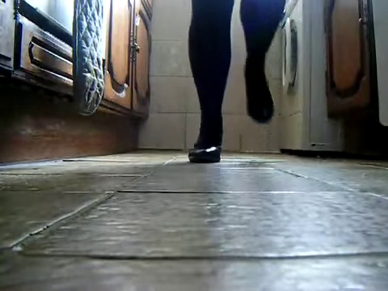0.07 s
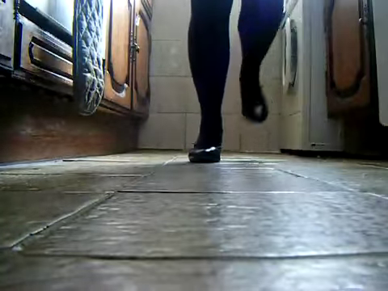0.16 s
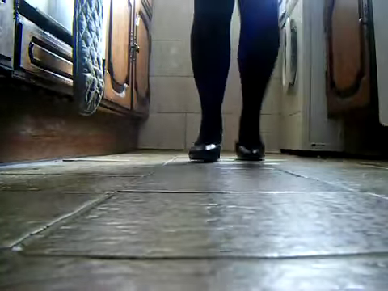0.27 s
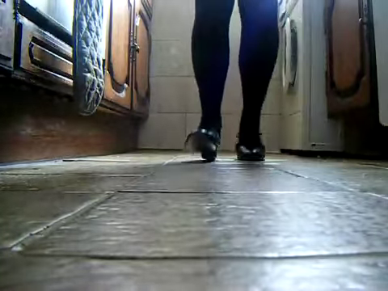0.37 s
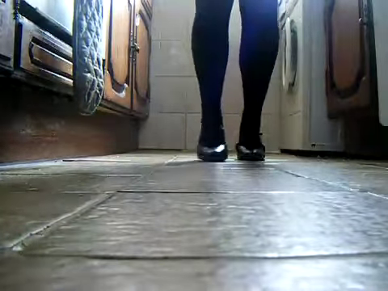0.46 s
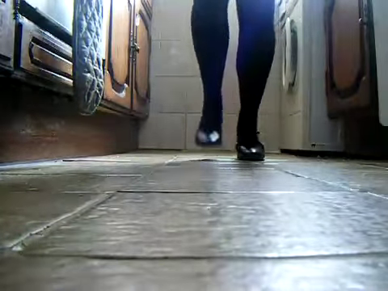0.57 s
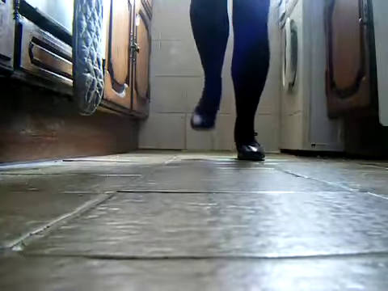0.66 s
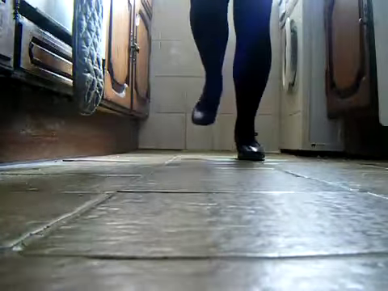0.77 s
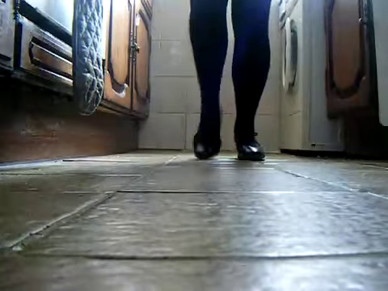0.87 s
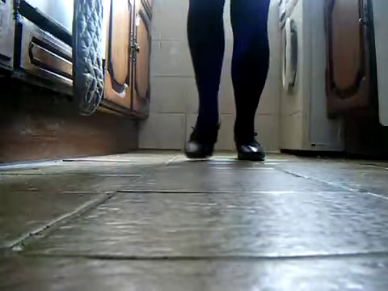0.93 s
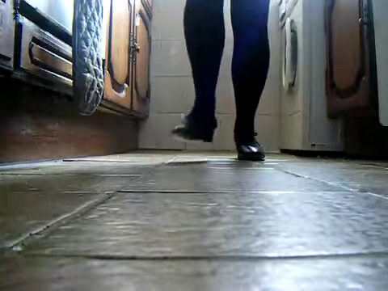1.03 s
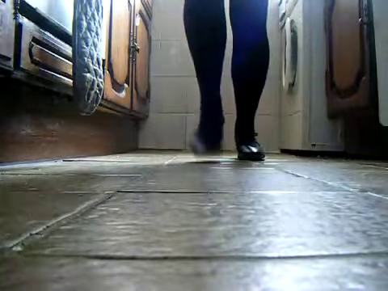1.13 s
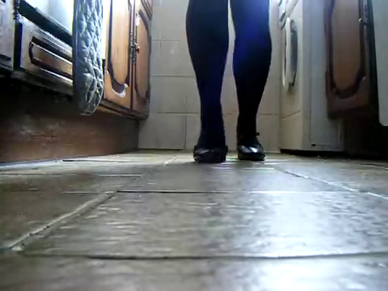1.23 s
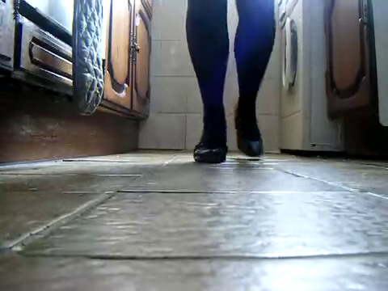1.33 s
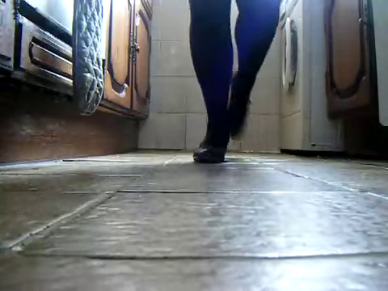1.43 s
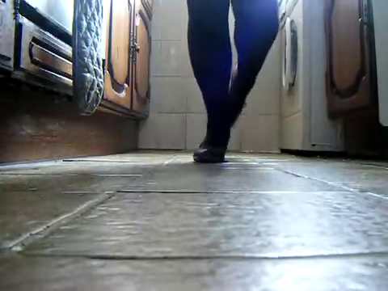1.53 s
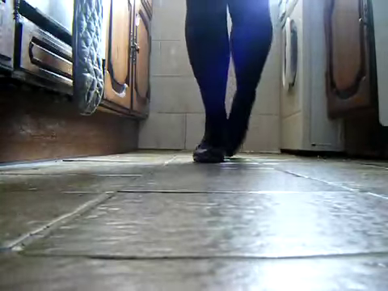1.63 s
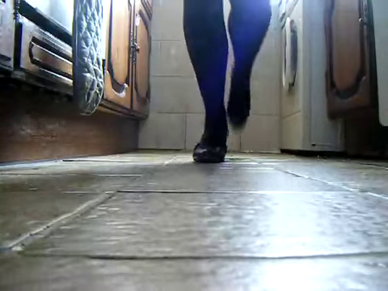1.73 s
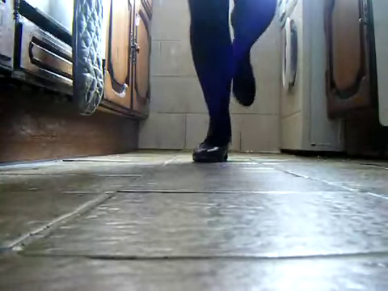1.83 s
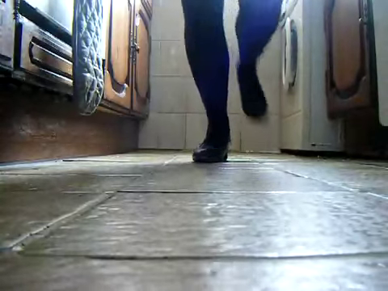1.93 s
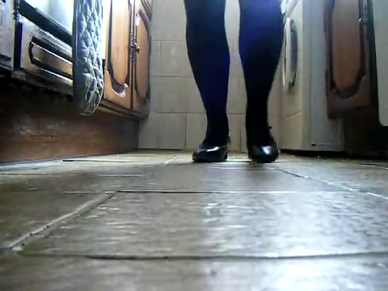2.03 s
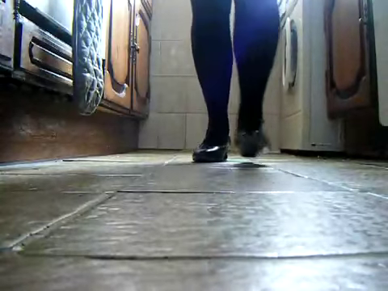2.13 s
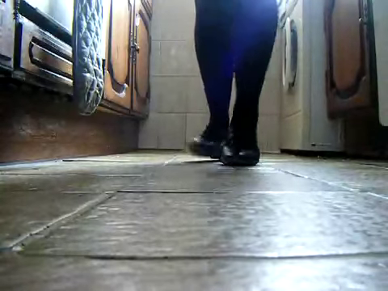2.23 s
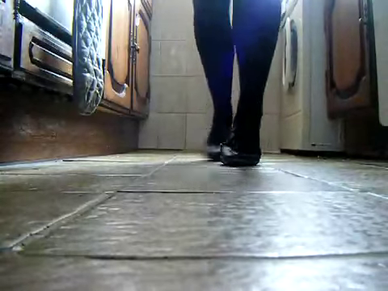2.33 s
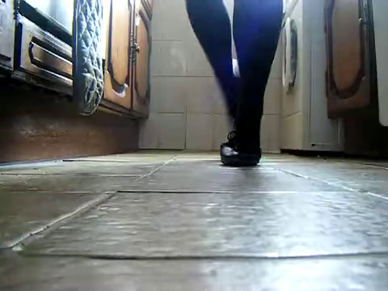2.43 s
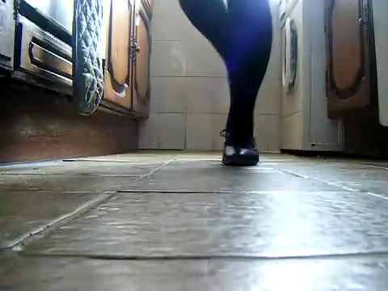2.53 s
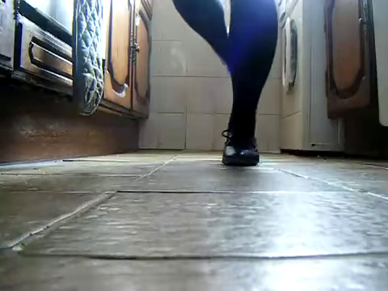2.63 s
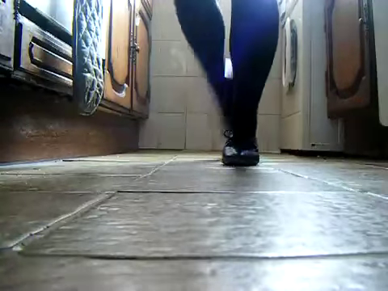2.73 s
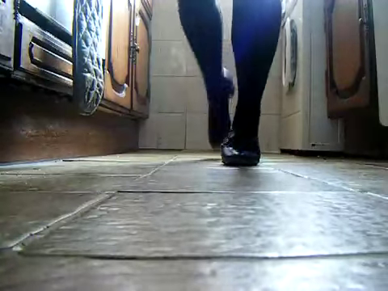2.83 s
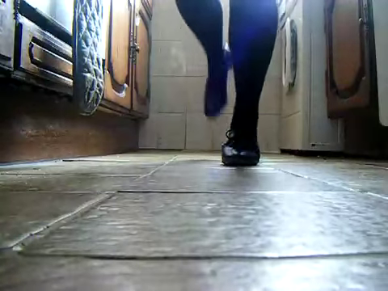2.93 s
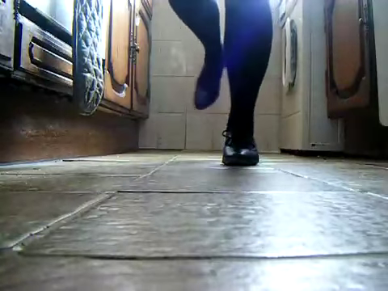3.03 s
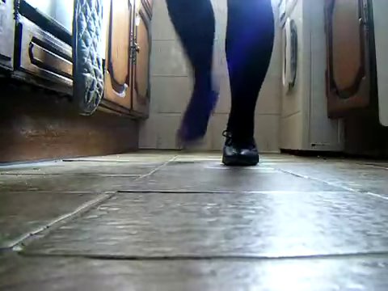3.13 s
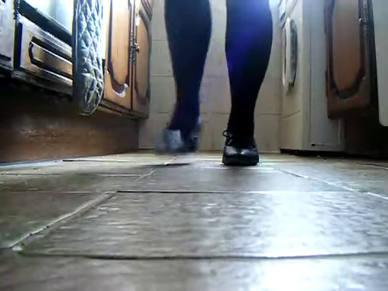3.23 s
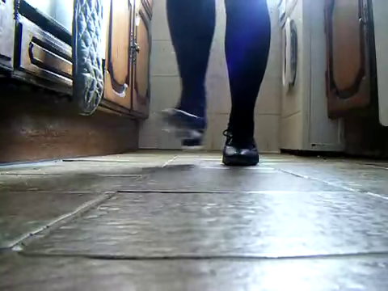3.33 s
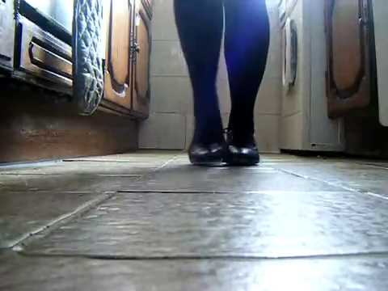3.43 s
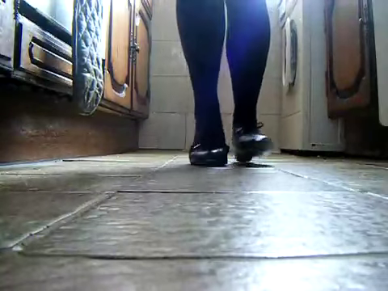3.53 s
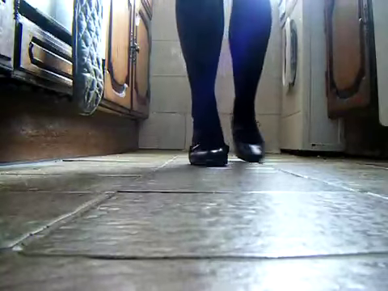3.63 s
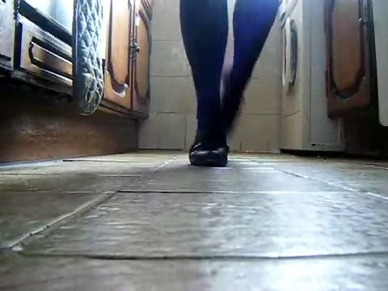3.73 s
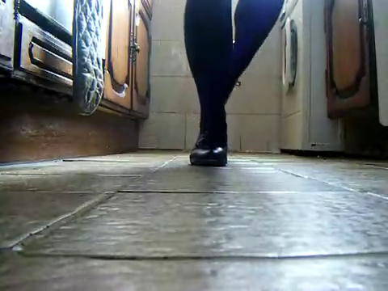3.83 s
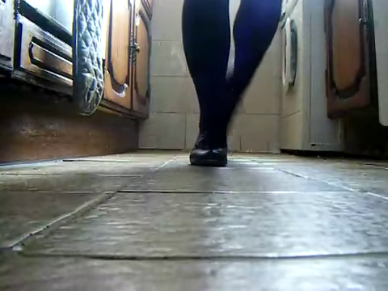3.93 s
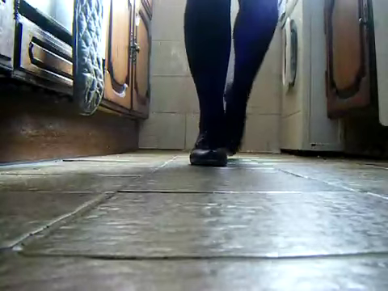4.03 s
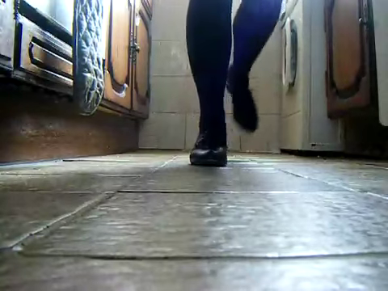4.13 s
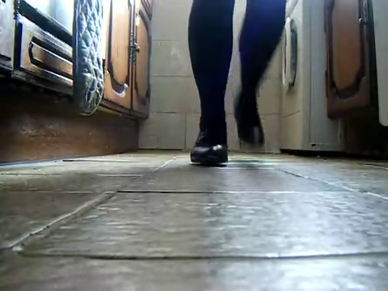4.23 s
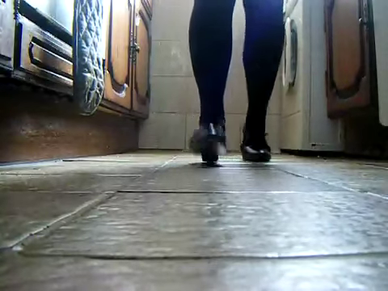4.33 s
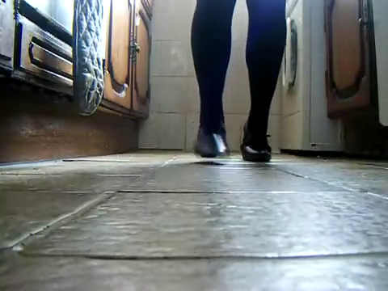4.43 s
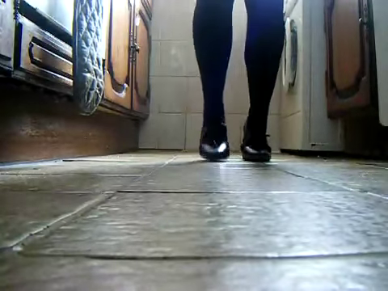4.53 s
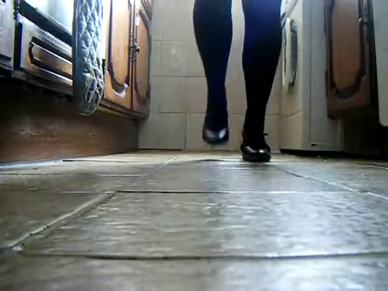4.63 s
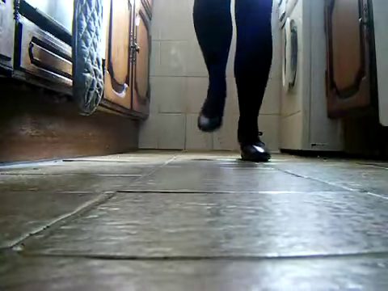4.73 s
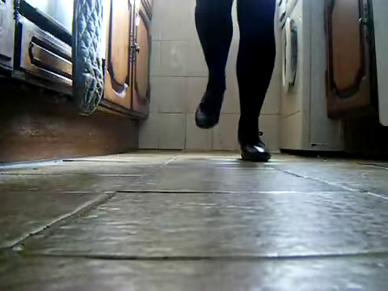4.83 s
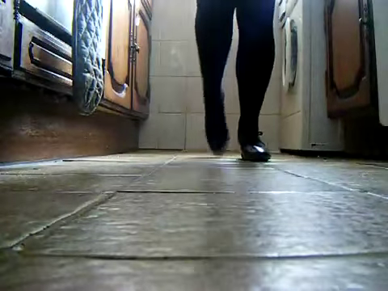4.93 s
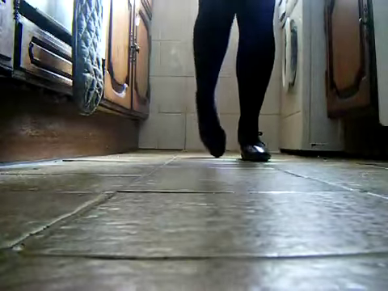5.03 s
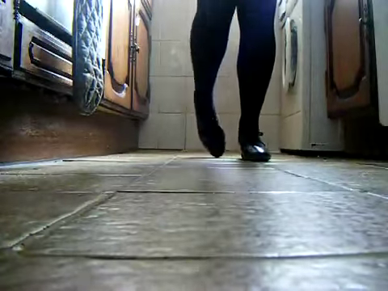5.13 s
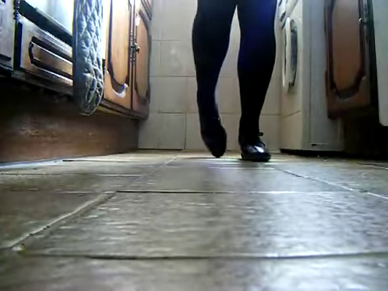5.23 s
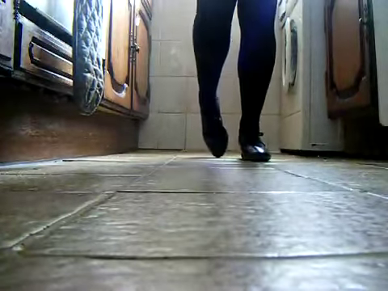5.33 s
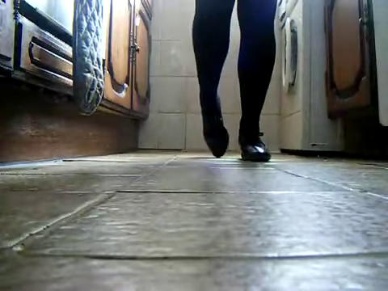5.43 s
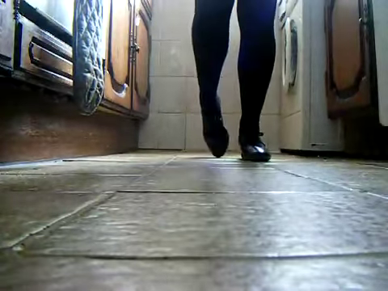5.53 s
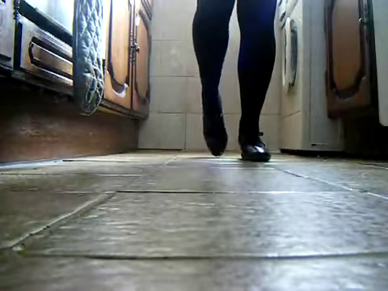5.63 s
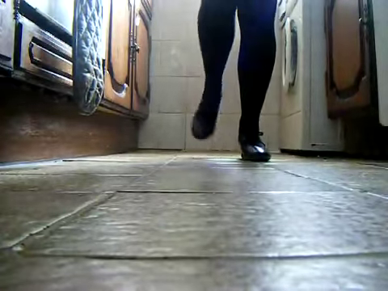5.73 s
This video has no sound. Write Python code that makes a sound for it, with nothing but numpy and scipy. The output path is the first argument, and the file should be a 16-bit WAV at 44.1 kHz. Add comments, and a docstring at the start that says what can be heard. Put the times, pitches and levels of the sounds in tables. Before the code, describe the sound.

Tap dancing on hard tile in a small kitchen, heard close from a floor-level microphone, begins mid-dance. From 0 to 1 s, clacks come about every 0.2 s, strong at 0.1, 0.5 and 0.7, softer at 0.3 and 0.85, with faint grazes and tiny skids between. A bright metallic tap lands at 1.1, then one of the hardest cracks at 1.4, a medium tap at 1.6, a dull heel drop at 1.8 and a tap at 2.0. Sharp taps cluster at 2.25, 2.4 and 2.55, some trailed by gritty scrapes. Softer steps at 2.75, 3.0 and 3.2 lead to strong ones at 3.4, 3.65 and 3.85. A heel thuds at 4.2; taps follow at 4.5, 4.7, 4.9 and finally 5.2 s, joined by a heel. Every click dies in milliseconds, leaving a short, boxy echo swelling slightly over steady low room tone and hiss, which remain after the last step.

```python
"""A dancer in tap shoes steps on the tiled floor of a small, hard kitchen, heard from a microphone on the floor.
Taps, heel drops, touches and skids push damped modes of shoe, tile and tap plate; each strike rings for milliseconds.
The room answers with first walls, a diffuse tail and standing waves, over steady room tone and hiss.
Gain control ducks after loud strikes and climbs back steadily, holding the echo up as a short wash."""
import sys
import numpy as np
from scipy import signal
from scipy.fft import rfft, irfft, next_fast_len
from scipy.io import wavfile
from scipy.ndimage import uniform_filter1d, minimum_filter1d

SR = 44100
rng = np.random.default_rng(int(sys.argv[2]) if len(sys.argv) > 2 else 0)


def master_out(mix):
    """Clip the mix to full scale and print it as 16-bit PCM to the path in sys.argv[1]."""
    frames = np.transpose(np.atleast_2d(mix))
    ceiling = np.clip(frames, -1, 1)
    pcm = np.round(ceiling * 32767).astype(np.int16)
    wavfile.write(sys.argv[1], SR, pcm)


N = 255339
LEAD = SR // 5  # samples before the audible start: the dance is already under way
TAP_ROOM_DB, HEEL_ROOM_DB, TOUCH_ROOM_DB, SKID_ROOM_DB = 2.5, -4, 2.5, -3

# full taps; pitch and ring depend on the part of the shoe that lands:
# (time [s], force [dB], sole pitch [Hz], knock [dB], plate pitch [Hz], plate [dB], jingle [dB])
FULL_TAPS = [(-0.06, 12.5, 640, -5, 2670, 0, -4), (0.0874, 19, 1004, -3.5, 2620, 0, -13.5),
             (0.293, -1, 680, 2.5, 3810, -3, -13.5), (0.488, 19, 984, -3.5, 3990, -3.5, -19.5),
             (0.684, 19, 730, -26, 5270, 0.5, -4), (0.8525, 5, 925, 0, 4380, -5, -10),
             (1.085, 17, 860, -1, 3890, 5, -10.5), (1.384, 24.5, 877, 0.5, 4500, -26, -10.5),
             (1.609, 10, 650, 0, 2830, -7, -10), (2.0126, 9.5, 717, 1.5, 2300, -16, -12.5),
             (2.239, 20.5, 1013, -3, 4530, -9.5, -24.5), (2.404, 13, 1028, 2.5, 4700, -1.5, -25.5),
             (2.561, 22, 880, -0.5, 4260, -15.5, -7.5), (2.743, 2, 682, -1, 4260, -9.5, -24),
             (2.9947, 9, 648, -1.5, 3510, -1.5, -21.5), (3.22, -3, 637, 0.5, 4200, -7.5, -20),
             (3.391, 18.5, 910, -1.5, 4230, -12, -10), (3.662, 15, 800, -0.5, 3690, 2.5, -14),
             (3.8425, 19.5, 1144, -4.5, 4070, -3.5, -18.5), (4.028, -0.5, 910, 2.5, 4560, -4, -26),
             (4.489, 15.5, 982, -5, 4280, -4, -22.5), (4.6843, 18, 820, -2, 2620, -8, -9),
             (4.9269, 4.5, 744, -1.5, 4480, -7, -23), (5.1785, 8.5, 920, -1, 4000, -14, -9.5)]
# weight comes down on a heel, alone or with a tap: (time [s], force [dB], sole pitch [Hz])
HEEL_LANDINGS = [(1.8342, 4.5, 550), (2.9952, -0.5, 416), (4.2098, 2, 964), (5.1776, -5, 885)]
# a shoe grazes the tile between taps: (time [s], force [dB])
LIGHT_TOUCHES = [(.064, -27), (.452, -25), (3.189, -24), (3.588, -24)]
# the toe plate catches again and skids: (time [s], length [s], level [dB])
TOE_SKIDS = [(.009, .012, -12.5), (.585, .02, -5.5), (0.641, .014, -6.5), (1.125, .012, 5.5),
             (1.158, .01, -1), (1.503, .014, 1), (2.248, .012, 4), (2.3108, .024, -0.5), (2.604, .03, 5),
             (3.412, .025, 6), (3.886, .02, 5.5), (4.612, .012, -6)]


def dance():
    """Taps, heel drops, light touches and skids, all in the same room."""
    track = np.zeros(LEAD + N)
    for time_s, force_db, *shoe in FULL_TAPS:
        land(track, amp(force_db) * tap(force_db, *shoe), time_s, TAP_ROOM_DB)
    for time_s, force_db, sole_hz in HEEL_LANDINGS:
        land(track, amp(force_db) * heel(sole_hz), time_s, HEEL_ROOM_DB)
    for time_s, force_db in LIGHT_TOUCHES:
        land(track, amp(force_db) * touch(), time_s, TOUCH_ROOM_DB)
    for time_s, length_s, level_db in TOE_SKIDS:
        land(track, amp(level_db) * skid(length_s), time_s, SKID_ROOM_DB)
    return track


SOLE_HZ, RING = 857, 0.54  # a shoe that lands nearer its tip rings higher and, in proportion, longer
KNOCK_HZ, KNOCK_FOLLOWS = 1850, 0.16  # octaves the tile's knock rises per octave of the sole
WEIGHT_DB, THUD_DB_PER_DB = -3.5, -0.5244  # the foot's weight stays alike, so sharper taps hold less thud


def tap(force_db, sole_hz, knock_db, plate_hz, plate_db, jingle_db):
    """The shoe's tilt sets the knock's pitch and the ring, the force sets the share of thud."""
    tilt = sole_hz / SOLE_HZ
    thud_db = WEIGHT_DB + THUD_DB_PER_DB * force_db
    knock_hz = KNOCK_HZ * tilt ** KNOCK_FOLLOWS
    return strike(thud_db, sole_hz, knock_hz, knock_db, plate_hz, plate_db, jingle_db, RING * tilt)


def heel(sole_hz):
    """A heel drop is mostly thud; the weighted plate hardly jingles."""
    return strike(thud_db=12.5, sole_hz=sole_hz, knock_hz=1780, knock_db=-2,
                  plate_hz=3356, plate_db=-5, jingle_db=-24.5, ring=0.79)


def touch():
    """An unweighted shoe rings freely."""
    return strike(thud_db=-11, sole_hz=920, knock_hz=1710, knock_db=-4,
                  plate_hz=4030, plate_db=-25, jingle_db=-21.5, ring=1.6)


def skid(length_s, grains_per_s=350, scatter_db=4, first_catch_db=-3):
    """The plate catches and slips on the tile: a run of tiny contacts of uneven size."""
    size = round(length_s * SR)
    catches = rng.random(size) < grains_per_s / SR
    grains = catches * amp(scatter_db * rng.standard_normal(size) - scatter_db)
    grains[0] = amp(first_catch_db)
    tick = strike(thud_db=-26.0, sole_hz=764, knock_hz=1350, knock_db=2.5,
                  plate_hz=2900, plate_db=-7.5, jingle_db=0.5, ring=0.29)
    return signal.fftconvolve(grains, tick)


# modes of the loose tap plate and its screws: (frequency [Hz], Q [1], level [dB])
PLATE_JINGLE = [(2276, 2.42, 8.5), (3661, 3.4, -0.5), (4760, 2.61, 7)]


def strike(thud_db, sole_hz, knock_hz, knock_db, plate_hz, plate_db, jingle_db, ring):
    """One contact of peak 1: a push into the modes of shoe, tile and plate; ring scales their Q."""
    f = np.fft.rfftfreq(SR // 20, 1 / SR)
    shoe = amp(thud_db) * resonance(f, hz=315.5, q=1.095) + resonance(f, sole_hz, q=2 * ring)
    tile = amp(knock_db) * resonance(f, knock_hz, q=3 * ring)
    plate = amp(plate_db) * resonance(f, plate_hz, q=6 * ring)
    loose = sum((-1) ** k * amp(level_db) * resonance(f, hz, q)
                for k, (hz, q, level_db) in enumerate(PLATE_JINGLE))
    jingle = amp(jingle_db) * loose
    # the contact time rounds off the treble, and a small shoe radiates little bass
    contact_hz, radiation_hz = 5400, 150
    soft = signal.freqs(*signal.butter(8, 1, analog=True), f / contact_hz)[1]
    thin = signal.freqs(*signal.butter(2, 1, "high", analog=True), f / radiation_hz)[1]
    click = irfft((shoe + tile + plate + jingle) * soft * thin)
    return click / np.abs(click).max()


def resonance(f, hz, q):
    """The same damped mode applied twice at one pitch: the ring swells for a cycle, then dies."""
    damping = 1j * f * hz / q
    return (damping / (hz * hz - f * f + damping)) ** 2


def land(track, click, time_s, room_db):
    """A strike arrives faintly through the floor, then through the air, then from the room."""
    floor_lead_s, floor_db = .003, -33
    add(track, click, time_s)
    add(track, amp(room_db) * signal.fftconvolve(click, kitchen()), time_s)
    tremor = rng.standard_normal(SR // 300)
    tremor /= np.linalg.norm(tremor)
    add(track, amp(floor_db) * np.convolve(click, tremor), time_s - floor_lead_s)


# nearby cupboards and walls: (delay [s], level [dB])
WALL_ECHOES = [(.007, -11), (.0115, -18), (.024, -18), (.030, -19)]
# decay of the diffuse tail: (frequency [Hz], t60 [s])
TAIL_DECAY = [(150, 0.34), (400, 0.4), (1000, 0.28), (3000, 0.31), (6000, 0.24)]
# relative spectrum of the diffuse tail: (frequency [Hz], level [dB])
TAIL_COLOUR = [(100, 3), (170, -3.5), (300, 1), (420, 15), (600, 2), (1200, 4.5), (2500, -1.5), (4500, 3),
               (6500, 3.5)]
# standing waves between the walls: (frequency [Hz], level [dB], t60 [s])
STANDING_WAVES = [(170, -63, .45), (247, -61, .42), (301, -57, .4), (330, -56, .4), (387, -57, .38),
                  (619, -63, .36), (695, -59, .36), (832, -59, .36), (1075, -62, .36)]


def kitchen(build_up_s=0.00033, wander=0.065):
    """The room's answer, redrawn per strike: first walls, diffuse tail, standing waves."""
    hz, frames_s, noise = signal.stft(rng.standard_normal(SR * 3 // 5), SR, nperseg=256)
    colour_db = along(TAIL_COLOUR, hz)[:, None]
    fade_db = colour_db - 60 * frames_s / along(TAIL_DECAY, hz)[:, None]
    answer = signal.istft(noise * amp(fade_db), SR, nperseg=256)[1]
    t = np.arange(len(answer)) / SR
    answer *= 1 - np.exp(-(t / build_up_s) ** 2)
    answer /= np.linalg.norm(answer)
    for delay_s, level_db in WALL_ECHOES:
        wandered_s = abs(delay_s * (1 + wander * rng.standard_normal()))
        answer[round(wandered_s * SR)] += amp(level_db)
    for mode_hz, level_db, t60_s in STANDING_WAVES:
        wave = np.sin(2 * np.pi * (mode_hz * t + rng.random()))
        answer += amp(level_db - 60 * t / t60_s) * wave
    return answer


# relative spectrum of room tone and hiss: (frequency [Hz], level [dB])
NOISE_COLOUR = [(20, 3), (60, 7.5), (120, 4), (300, 5.5), (660, -3), (4400, -3.5), (6400, -11.5),
                (7500, -67)]


def background(level_db=-49.5):
    """Steady room tone and microphone hiss: noise of fixed colour; level is RMS before the microphone."""
    noise = filtered(rng.standard_normal(LEAD + N), lambda hz: amp(along(NOISE_COLOUR, hz)))
    return amp(level_db) * noise / noise.std()


# microphone response: (frequency [Hz], gain [dB])
MICROPHONE_RESPONSE = [(30, 17), (200, -5), (450, 0.5), (1000, 6.5), (1250, 10.5), (2400, -0.5), (3200, 3),
                       (4000, 3), (5400, -4.5), (5900, -2), (6400, -2), (7000, -10.5), (7600, -23)]


def microphone(x):
    """Colour the sound by the microphone's frequency response."""
    return filtered(x, lambda hz: amp(along(MICROPHONE_RESPONSE, hz)))


def gain_control(x, target_db=0.0, release_db_per_s=175):
    """The gain sinks over 6 ms after a peak, letting the crack through, and climbs back steadily."""
    over_db = np.maximum(20 * np.log10(np.abs(x) + 1e-9) - target_db, 0)
    climb_db = release_db_per_s * np.arange(len(x)) / SR
    # highest past peak, less the recovery since
    cut_db = np.maximum.accumulate(over_db + climb_db) - climb_db
    attack = np.hanning(round(.006 * SR))
    smooth_cut_db = np.convolve(cut_db, attack / attack.sum())[:len(x)]
    return x * amp(-smooth_cut_db)


def limiter(x, ceiling=1.14):
    """A fast soft-knee limiter: only the hardest cracks still pass full scale."""
    gain = (1 + (x / ceiling) ** 4) ** (-1 / 4)
    held_gain = minimum_filter1d(gain, size=35)
    return x * uniform_filter1d(held_gain, size=35)


def amp(db):
    """Decibels to gain."""
    return 10 ** (np.asarray(db) / 20)


def along(points, hz):
    """(frequency [Hz], value) points read on a log frequency axis."""
    f, values = np.transpose(points)
    return np.interp(np.log(hz + 1), np.log(f + 1), values)


def filtered(x, response):
    """x filtered by a response given as a function of Hz."""
    size = next_fast_len(len(x) + 8192)
    spectrum = rfft(x, size) * response(np.fft.rfftfreq(size, 1 / SR))
    return irfft(spectrum, size)[:len(x)]


def add(track, sound, time_s):
    """Mix a sound into the track."""
    start = max(round(time_s * SR) + LEAD, 0)
    part = track[start:start + len(sound)]
    part += sound[:len(part)]


def scene():
    """The dance over the background, through microphone and gain control; the lead is cut off."""
    heard = microphone(dance() + background())
    return gain_control(heard)[None, LEAD:]


def record(dry):
    """Limiter and bass cut feed a converter slightly off zero that clips peaks; then a steep treble cut."""
    offset, bass_cut_hz, top_hz = -.0039, 145, 15800
    bass_cut = signal.butter(2, bass_cut_hz, "high", fs=SR)
    lean = signal.lfilter(*bass_cut, limiter(dry[0]))
    clipped = np.clip(lean + offset, -1, 1)
    return filtered(clipped, lambda hz: 1 / np.sqrt(1 + (hz / top_hz) ** 100))[None]


dry = scene()
out = record(dry)
master_out(out)
```